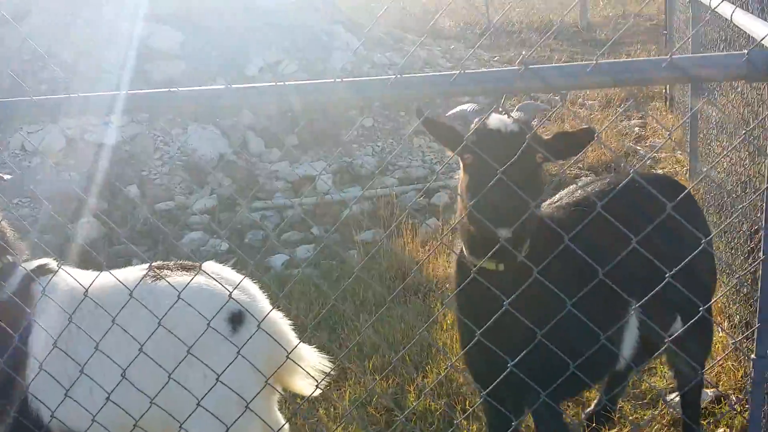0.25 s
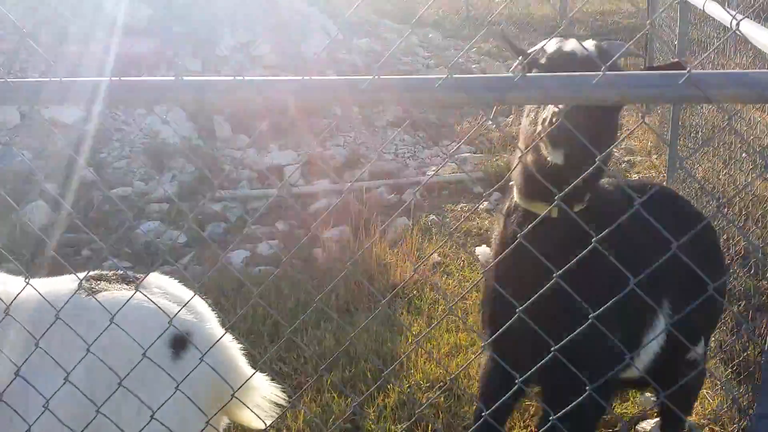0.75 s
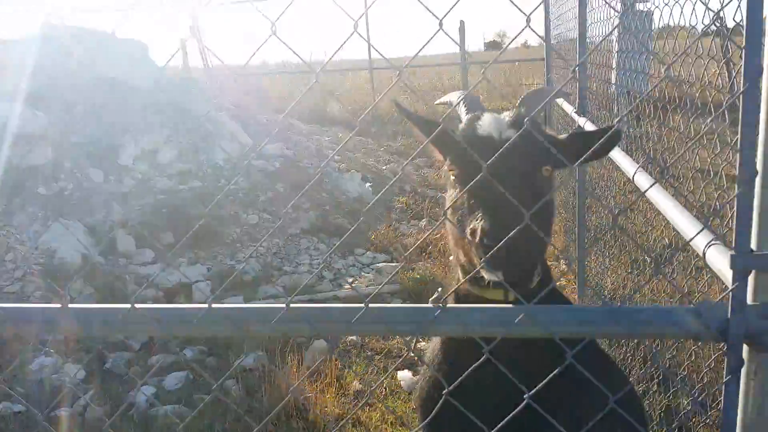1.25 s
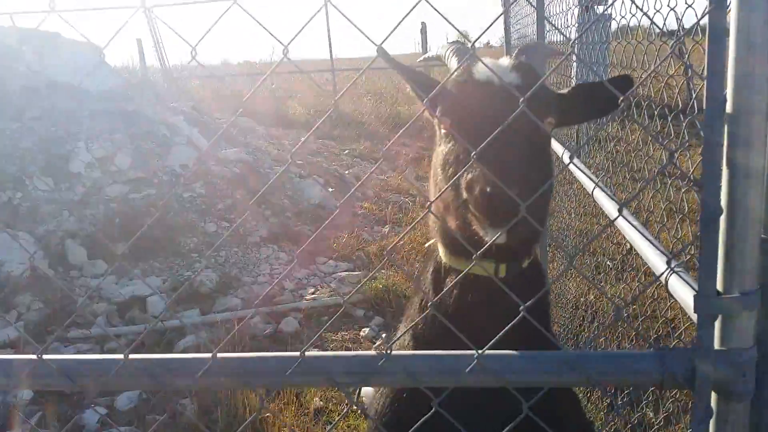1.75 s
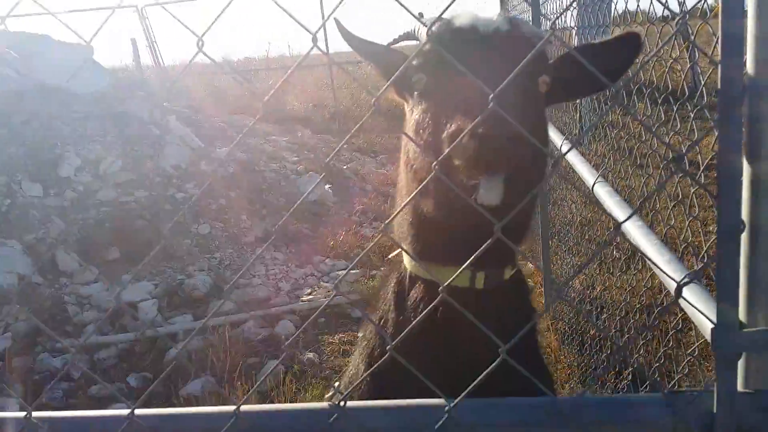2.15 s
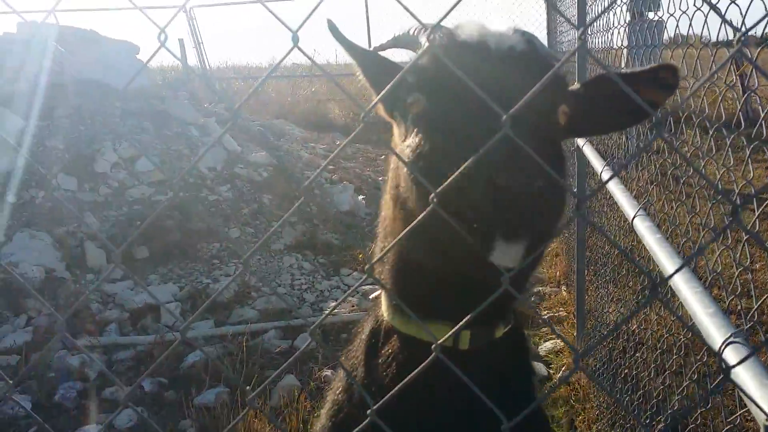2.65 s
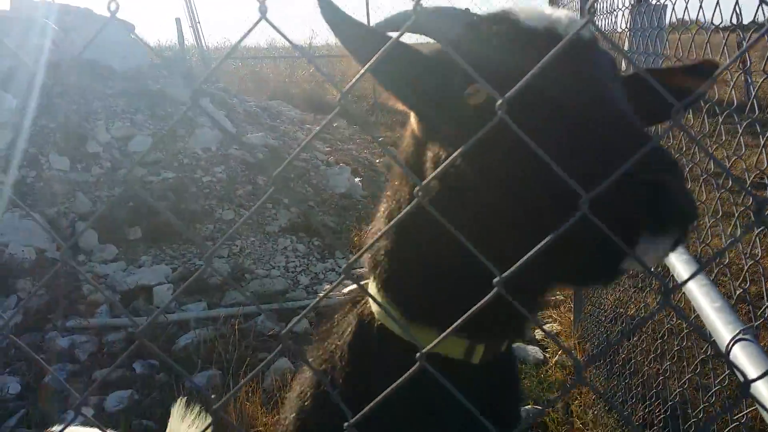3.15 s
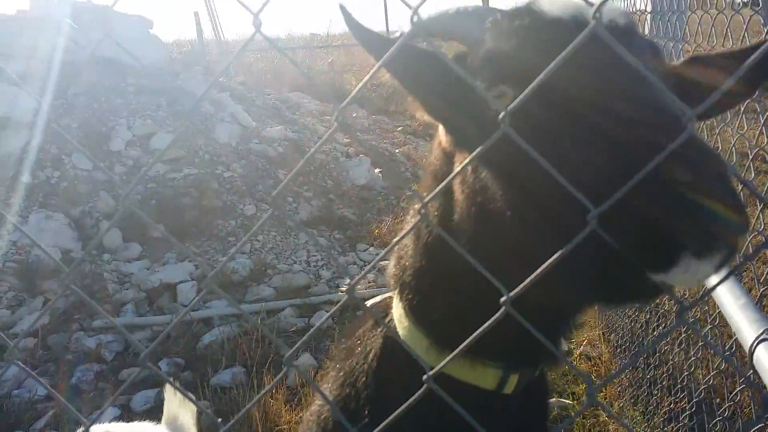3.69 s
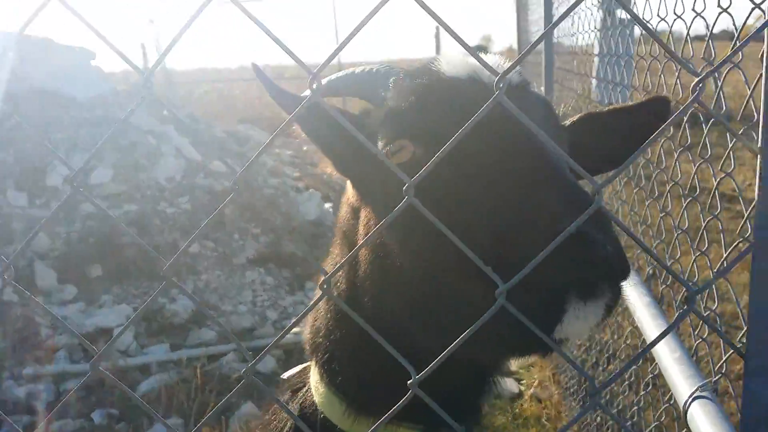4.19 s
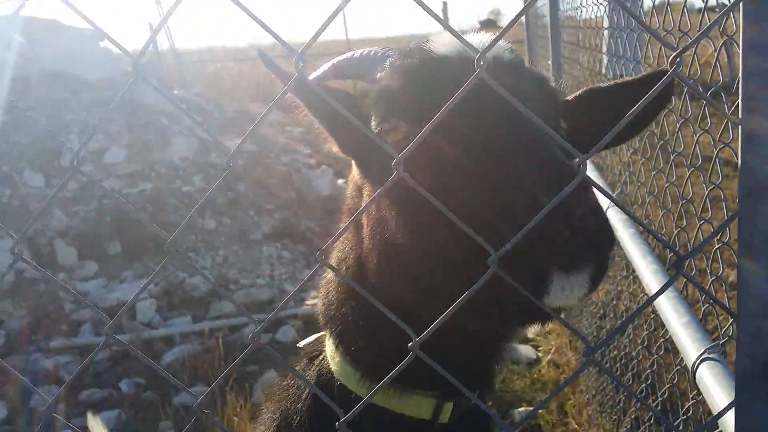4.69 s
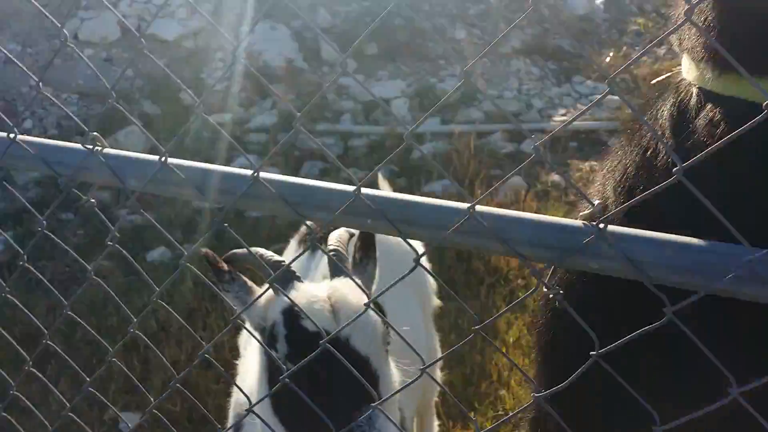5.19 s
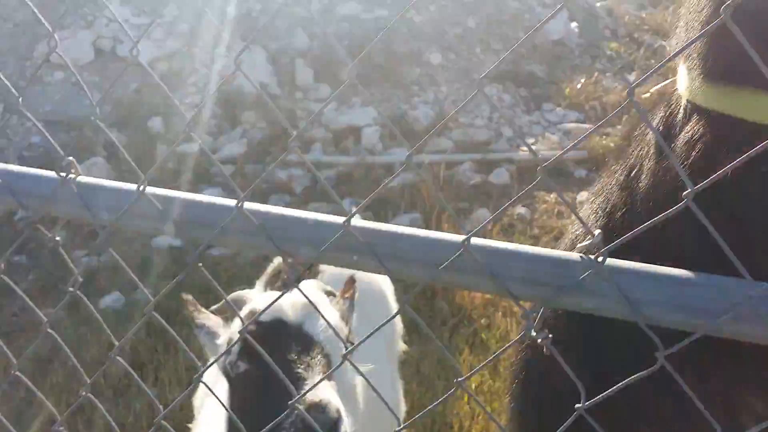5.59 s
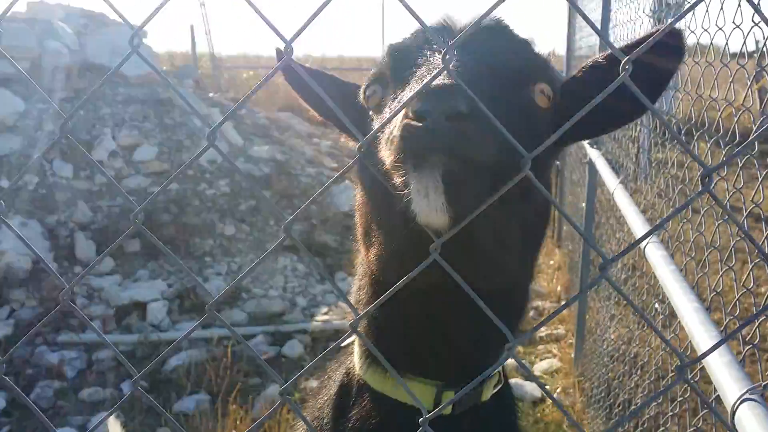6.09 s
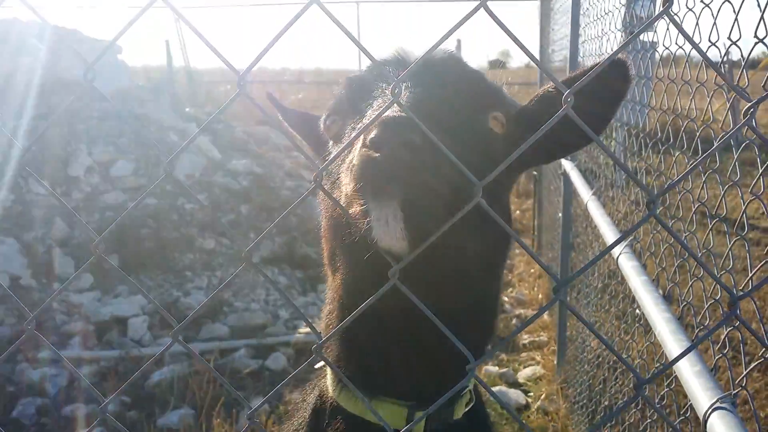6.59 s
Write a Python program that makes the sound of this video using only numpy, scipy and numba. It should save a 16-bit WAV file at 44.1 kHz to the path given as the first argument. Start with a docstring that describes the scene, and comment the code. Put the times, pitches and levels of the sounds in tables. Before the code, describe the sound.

Outdoors, a low raspy goat bleat, a burst of clinking fence wire, then more bleats in a quick run, with small squeaks.

```python
"""An open field, beside a chain-link fence: small goats grunt short hoarse bleats close to a hand-held phone.
Each bleat is a source-filter voice: uneven glottal pulses and breath ring the resonances of the tract.
One goat leans on the fence, whose damped modes rattle and tick and whose stick-slip squeaks.
Behind lie noise bands for far traffic and bass wind, a rustle, a falling bird whistle and a far hum.
The right microphone port is half covered, so the field reaches it late and dull."""
import sys
import numpy as np
from scipy import signal
from scipy.fft import rfft, irfft
from scipy.io import wavfile
from scipy.ndimage import uniform_filter1d
from numba import njit

SR = 44100
rng = np.random.default_rng(int(sys.argv[2]) if len(sys.argv) > 2 else 0)


def pcm_store(signal):
    """Save signal as 16-bit PCM."""
    levels = np.round(np.clip(np.atleast_2d(signal), -1, 1) * 32767)
    wavfile.write(sys.argv[1], SR, levels.astype(np.int16).T)


N = 301644
TIME = np.arange(N) / SR

# Levels hold ahead of the port gains; a width is that of one filter pass.
# Wind and traffic: (time [s], wind level [dB], drone level [dB])
AIR = [(0.0, -54.5, -58.5), (0.6, -54, -53), (0.95, -55, -55.5), (1.6, -49.5, -55.5), (1.75, -57, -57.5),
       (2.28, -49, -53.5), (2.63, -61, -60.5), (2.97, -52, -59.5), (3.2, -54, -46.5), (3.49, -52.5, -52),
       (3.87, -63, -55), (4.42, -54.5, -59.5), (4.99, -54.5, -48), (5.12, -41, -54), (5.31, -49.5, -49),
       (5.9, -54, -55), (6.67, -57, -57.5), (6.84, -58, -54)]
# Relative spectrum of the traffic: (frequency [Hz], density [dB per Hz])
DRONE_SPECTRUM = [(71, -31), (120, -0.5), (307, -4), (361, -10), (482, -3.5), (731, 0), (1280, -20),
                  (1400, -42), (2410, -30.5), (6740, -32), (9000, -38.5), (11700, -67), (19800, -120)]
# Gusts thump the phone: (time [s], blow [dB], frequency [Hz])
BUMPS = [(2.889, -52, 83.4), (2.945, -32, 80.6), (5.123, -27, 104)]
# Gliding bird whistle: (time [s], frequency [Hz], level [dB])
BIRD = [(.465, 9490, -64.5), (.49, 8600, -74), (.52, 7900, -68), (.55, 7320, -77)]
# A goat further off hums: (time [s], pitch [Hz], level [dB])
FAR_HUM = [(4.44, 283.7, -72), (4.5, 287.8, -60), (4.606, 287.4, -59.5), (4.733, 305.7, -57),
           (4.893, 302, -59), (4.93, 321, -56)]
# Microphone hiss re HISS_DB: (frequency [Hz], level [dB])
HISS_SPECTRUM = [(40, 10), (3000, 0), (7000, -6.5), (11000, -2.5), (15000, 0.5)]

# Wire knocks wire: (time [s], strength [dB], treble [dB re strength])
KNOCKS = [(0.597, -45.5, -6), (0.616, -38.5, -11), (0.642, -36.5, -11), (0.666, -42.5, -6),
          (0.696, -46, -11), (0.73, -56, -16), (0.7806, -64, 9), (0.8228, -47, -1.5), (0.9047, -53.5, -9),
          (0.9977, -49.5, -7.5), (1.0775, -58, -21), (1.0933, -32.5, -11), (1.141, -27, -12.5),
          (1.162, -30.5, -8), (1.1795, -24, -8), (1.195, -28.5, -29), (1.225, -26.5, -22),
          (1.27, -28.5, -15), (1.3155, -29.5, -6.5), (1.353, -28.5, -5.5), (1.367, -50, -20),
          (1.397, -27, -20), (1.414, -33, -22), (1.431, -23.5, -18), (1.445, -44, -16), (1.454, -26, -27),
          (1.49, -32, -8), (1.545, -33.5, -10), (1.584, -44, -4), (1.635, -43.5, -19), (1.684, -46, -11),
          (1.6937, -45.5, -12), (1.744, -49, -7), (1.8053, -59.5, 1.5), (1.929, -47, -6)]
# Wire modes: (frequency [Hz], level [dB], decay time to -60 dB [s])
WIRE_MODES = [(2740, -4, .05), (2850, -1, .11), (2960, 0, .12), (3080, -3, .09), (3200, -3, .05),
              (3810, -9, .04), (4590, -7, .04), (5510, -7, .04), (6300, -7, .04), (6600, -4, .04),
              (6980, -6, .04), (7260, -8, .04), (7750, -2, .075), (8210, -2, .05), (9200, -10, .03),
              (12300, -14, .03), (14800, -11, .03)]
# Rumble of the posts: (time [s], level [dB])
RUMBLE = [(.56, -69), (.61, -54), (.85, -50.5), (.98, -81), (1.02, -61.5), (1.22, -47.5), (1.32, -58.5),
          (1.5, -53), (1.63, -53), (1.69, -65), (1.72, -51.5), (1.76, -50.5), (1.78, -64), (1.84, -64),
          (1.86, -50.5), (1.89, -59), (2.06, -64.5)]
# Dry single ticks: (time [s], blow [dB], frequency [Hz])
TICKS = [(0.7793, -27.5, 6800), (0.8036, -40, 6400), (4.277, -39.5, 6530)]
# Wire slips on a post: (time [s], length [s], slip rate at start, middle, end [Hz], level [dB],
# ring [Hz], ring width [Hz], peak of the ground tone [dB re level])
SQUEAKS = [(1.598, 0.048, 1020, 970, 1160, -58, 1490, 1200, 6),
           (1.728, 0.059, 800, 850, 900, -58, 1680, 600, -13),
           (1.838, 0.068, 800, 840, 850, -57, 1690, 600, -16),
           (2.391, 0.074, 615, 610, 840, -53, 1250, 597, -4),
           (2.685, 0.04, 490, 700, 420, -66, 1290, 1510, -5),
           (3.916, 0.041, 610, 585, 580, -55, 1290, 2040, -2),
           (4.103, 0.041, 1150, 1150, 900, -79, 2100, 1200, 9),
           (4.136, 0.043, 903, 800, 640, -71, 1600, 900, -8),
           (4.312, 0.028, 620, 640, 430, -63, 1400, 900, -8),
           (4.332, 0.046, 1140, 1300, 1260, -64, 2500, 700, 7.5),
           (5.291, 0.049, 360, 372, 368, -36, 4760, 2800, 0.5),
           (5.395, 0.055, 371, 391, 372, -34, 4110, 1910, -8.5),
           (5.496, 0.013, 387, 380, 360, -49, 4500, 5000, -22),
           (6.667, 0.048, 622, 570, 580, -59.5, 2430, 3000, 10)]
# One value a squeak: (timing jitter [cycles])
SLIP_UNEVEN = [.03, .012, .012, .02, .04, .012, .02, .04, .03, .02, .004, .005, .01, .003]
# One value a squeak: (share by which the ring climbs [1])
RING_RISE = [0, 0, 0, 0, 0, 0, 0, 0, 0, 0, 0, .25, 0, 0]

# One curve a bleat: (time [s], pitch [Hz], level [dB])
BLEATS = [
    [(0.197, 122.7, -28), (0.213, 125.2, -39), (0.287, 147.2, -30), (0.325, 161.7, -30),
     (0.339, 162.1, -30), (0.399, 150.2, -30), (0.427, 148, -33), (0.436, 144, -39)],
    [(2.063, 121.6, -34), (2.079, 123.4, -43), (2.129, 139.2, -44), (2.207, 143.1, -38),
     (2.263, 160, -38.5), (2.297, 157.1, -40), (2.321, 157.1, -38), (2.38, 133, -51)],
    [(3.108, 121.4, -28), (3.12, 123.8, -47), (3.15, 138.6, -45.5), (3.208, 143.8, -42),
     (3.232, 144.7, -42.5), (3.342, 149.9, -41.5), (3.402, 143.6, -44.5), (3.45, 140, -76)],
    [(4.656, 147.8, -53), (4.678, 147.5, -50), (4.73, 128, -47), (4.774, 129.1, -46), (4.81, 132.4, -42),
     (4.866, 133.9, -50), (4.88, 134.5, -61)],
    [(4.922, 135, -45), (4.952, 143.5, -41.5), (4.982, 145.9, -38.5), (5.024, 162.6, -33),
     (5.096, 168.3, -35), (5.18, 168.4, -33), (5.232, 154.4, -33.5), (5.25, 149.8, -36.5)],
    [(5.25, 152.5, -33), (5.26, 153.3, -43), (5.302, 153.3, -41), (5.326, 148.2, -41), (5.356, 150.5, -43),
     (5.384, 149.6, -44.5), (5.388, 151.2, -44.5), (5.43, 134.7, -46.5)],
    [(5.498, 131.5, -44), (5.535, 140.7, -38.5), (5.563, 158.8, -31.5), (5.605, 162.9, -31),
     (5.671, 163.6, -30.5), (5.721, 162, -32.5), (5.763, 147.8, -33), (5.79, 144, -51)],
    [(5.877, 139, -48), (5.889, 145.4, -41), (5.909, 149.8, -43), (5.929, 155.6, -39.5),
     (5.973, 156.5, -45.5), (6.013, 150, -43.5), (6.037, 155.5, -43.5), (6.07, 153, -54.5)],
    [(6.716, 137.7, -33), (6.738, 137.2, -43.5), (6.766, 132.2, -40.5), (6.8, 135.7, -41.5),
     (6.822, 144, -34), (6.828, 139, -40), (6.84, 151.5, -33)],
]
# Widest mouth opening, one value a bleat: (time [s])
CRESTS = [.33, 2.28, 3.3, 4.78, 5.13, 5.3, 5.65, 5.93, 6.86]
# Roughness of each bleat, 0 to 1: (start [1], crest [1], release [1])
HOARSENESS = [(.7, .45, .25), (.75, .4, .4), (.6, .1, .2), (.55, .22, .25), (.75, .23, .4), (.4, .35, .4),
              (.6, .08, .35), (.45, .25, .35), (.6, .4, .4)]
# Resonances of each bleat: (throat [Hz], mouth [Hz], palate [Hz], nose [Hz],
# frequency scale of the rasp [1], rasp tilt [dB per octave])
RESONANCES = [(555, 1085, 1360, 1940, 0.995, 1), (620, 1033, 1283, 1700, 1.06, -9.5),
              (604, 1000, 1380, 1430, 0.985, -10), (550, 970, 1250, 1770, 0.977, -16),
              (588, 1040, 1381, 2040, 1.02, -5.5), (710, 962, 1210, 1480, 1.047, -8),
              (657, 1087, 1338, 1930, 1.02, -2), (516, 933, 1190, 1470, 0.964, -1.5),
              (580, 1150, 1350, 1710, 1.046, -4.5)]
# Colour of each bleat: (palate at the crest [dB re mouth], throat, nose, rasp, chest peak [dB re level])
COLOURS = [(-1.5, -23.5, -13.5, -7.5, -12.5), (4, -13, -9, -8.5, -3.5), (-12, -12.5, -12.5, -8.5, -7.5),
           (-7, -8, -13.5, -10, -5), (13.5, -10.5, -10.5, -8.5, -6.5), (-3, -9, -1.5, -0.5, -4.5),
           (16, -9.5, -11.5, -5.5, -10), (-14, -3, -1, -6.5, -4.5), (7.5, -10, -11, -11, -6.5)]
# Upper resonances before scale and tilt: (frequency [Hz], width [Hz], level [dB])
RASP = [(2482, 520, 2), (3360, 545, 7.5), (4540, 770, 6.5), (5420, 680, 6), (6686, 680, 1),
        (8050, 12400, -11), (13900, 13000, -19)]
# Added to the five lowest rasp resonances, one row a bleat: (level [dB], five times)
RASP_LEVELS = [(-0.43, 6.5, 1.5, 3, 2.5), (-1.8, 0.5, 0.5, -7, -2.5), (1.8, 2.5, 2, -2, -2),
               (0, 3, -3, -4, 1), (0, 4, 0, 0, 2.5), (-0.15, 0, -4, -0.5, -8), (0, 0, -1, -3, -0.5),
               (-2, 6, -5, 3, -0.5), (0, 3, 0, -2, -2)]

# The links go on shaking after every knock; slope in dB of shake per dB of knock
JINGLE_DB, JINGLE_T60_S, JINGLE_SLOPE = -24.5, 0.27, 0.8
# Blows softer than SOFT_DB ring the modes below SOFT_HZ relatively more, by SOFT_LIFT dB per dB
SOFT_HZ, SOFT_DB, SOFT_LIFT = 3300, -30, .5
SCRAPE_DB = -57

THROAT_WIDTH_HZ, MOUTH_WIDTH_HZ, PALATE_WIDTH_HZ, NOSE_WIDTH_HZ = 220, 175, 130, 600
FILL_HZ, FILL_WIDTH_HZ, FILL_DB = 1214, 790, -7.5  # broad hoarseness between the resonances
HUM_HZ, HUM_WIDTH_HZ, HUM_DB = 1000, 480, 7.7  # throat of the far goat; dB re its ground tone
ATTACK_S, RELEASE_S, RELEASE_DB = .022, .018, -25
BREATH_T60_S, BREATH_DB = 0.2, -16.5  # breath runs on after the folds stop; dB re the loudest moment
PALATE_LOSS_START_DB, PALATE_LOSS_END_DB = 11, 8
RASP_LOSS_START_DB, RASP_LOSS_END_DB, CHEST_LOSS_START_DB = 2.5, 3.5, 5.5
THROAT_EARLY_DB = 2.5  # the throat is heard more while the mouth is still nearly shut
# Shares by which resonances lie lower at the start or the release
PALATE_DROP_START, PALATE_DROP_END, MOUTH_DROP_END, RASP_DROP_END = .16, .1, 0.065, 0.11
WAVER_DB, RASP_FLICKER_DB = 0.95, 2.5
PUFF_CYCLES = .7  # time constant of each breath puff
SPREAD_T60_S, SCATTER_DB = .014, 3  # the upper resonances answer each pulse over a few ms

PORT_HZ, PORT_WIDTH_HZ, PORT_DB = 6530, 1160, 0.18  # resonance of the open port
COVER_HZ, COVER_DB, COVER_LAG = 185, -3.5, 8  # lag in samples
LEAK_HZ, LEAK_DB = 4670, -25  # sound that creeps round the cover
OPEN_DB = 5  # gain of both ports
HISS_DB, TOP_HZ = -64, 15800


def undb(db):
    """Level to amplitude: twenty decibels are a factor of ten."""
    return 10 ** (np.asarray(db) / 20)


def unit(x):
    """Normalisation to a root-mean-square of one."""
    return x / np.sqrt(np.mean(x ** 2))


@njit
def svf(x, hz, width):
    """State-variable resonance: a band-pass with a moving centre, gain 1 there."""
    y, band_state, low_state = np.empty(len(x)), 0., 0.
    for i in range(len(x)):
        g, k = np.tan(np.pi * hz[i] / SR), width / hz[i]
        v = (band_state + g * (x[i] - low_state)) / (1 + g * (g + k))
        band_state = 2 * v - band_state
        low_state += 2 * g * v
        y[i] = k * v
    return y


def band(x, hz, width):
    """Resonance about a fixed or moving centre, kept inside the audible range."""
    return svf(x + 1e-18, np.clip(hz + np.zeros(len(x)), 20., .45 * SR), 1. * width)


def band2(x, hz, width):
    """Cascaded resonance: two equal passes steepen the skirts."""
    return band(band(x, hz, width), hz, width)


def twice(x, hz, width):
    """Cascaded resonance at unit level."""
    return unit(band2(x, hz, width))


def ring(x, hz, t60):
    """Damped free vibration: one mode decays exponentially, its envelope starting at the blow's size."""
    pole = np.exp(2j * np.pi * hz / SR - np.log(1000) / (t60 * SR))
    return signal.lfilter([1], [1, -pole], x).imag


def walk(rate, size=N):
    """Slow random modulation: levels held 1 / rate s and slewed twice; spread near 1."""
    hold = int(SR / rate)
    levels = np.repeat(rng.standard_normal(size // hold + 1), hold)
    return 1.33 * uniform_filter1d(uniform_filter1d(levels, hold), hold)[:size]


def pulses(hz, jitter, shimmer_db):
    """Quasi-periodic excitation: one pulse a cycle, jittered in time and size; also the phase in cycles."""
    phase = np.cumsum(hz) / SR
    cycle = np.arange(int(phase[-1])) + .5
    chance = rng.standard_normal((len(cycle), 2)).T
    due = np.searchsorted(phase, cycle)
    at = np.interp(cycle + jitter[due] * chance[0], phase, np.arange(len(hz) - 0.)).clip(0, len(hz) - 2)
    size = undb(shimmer_db[due] * chance[1].clip(-2, 1.3))
    out = np.zeros(len(hz))
    # share each pulse between the two nearest samples
    np.add.at(out, at.astype(int), size * (1 - at % 1))
    np.add.at(out, at.astype(int) + 1, size * (at % 1))
    return out, phase


def blows(times, sizes):
    """Impulsive excitation: single-sample blows."""
    out = np.zeros(N)
    np.add.at(out, (np.asarray(times) * SR).astype(int), sizes)
    return out


def taps(table, t60):
    """Impulse response of single modes: damped blows at (time [s], blow [dB], frequency [Hz])."""
    return sum(ring(blows([s], undb(db)), hz, t60) for s, db, hz in table)


def smear(x, t60, db):
    """Diffuse reflection: convolution with a short tail of decaying noise."""
    tail = rng.standard_normal(6000) * undb(-60 * np.arange(6000) / SR / t60)
    return undb(db) * signal.fftconvolve(x, tail / np.sqrt(np.sum(tail ** 2)))[:len(x)]


def spread(x, t60):
    """Scattering: each pulse gains a short tail of echoes whose pattern slowly turns into another."""
    turn = np.linspace(0, 1.5 * np.pi, len(x))
    return x + np.cos(turn) * smear(x, t60, SCATTER_DB) + np.sin(turn) * smear(x, t60, SCATTER_DB)


def whistle(table):
    """Frequency modulation: a near sine follows (time [s], frequency [Hz], level [dB])."""
    s, hz, db = np.transpose(table)
    gain = undb(np.interp(TIME, s, db, -200, -200))
    return np.sqrt(2) * gain * np.sin(2 * np.pi * np.cumsum(np.interp(TIME, s, hz)) / SR)


def traffic():
    """Filtered noise: half-octave bands that swell together and flicker alone make the far drone."""
    s, _, level_db = np.transpose(AIR)
    hz, density_db = np.transpose(DRONE_SPECTRUM)
    drone, swell = 0, walk(0.97)
    for f in 140 * 2 ** np.arange(0, 6.1, .5):
        colour_db = np.interp(np.log(f), np.log(hz), density_db) + 2.07 * swell + 3.4 * walk(8)
        drone = drone + undb(colour_db) * band2(rng.standard_normal(N), f, f / 2)
    return unit(drone) * undb(np.interp(TIME, s, level_db))


def bass_noise():
    """Band-limited turbulence: one independent draw of low-frequency noise."""
    return unit(band(band(rng.standard_normal(N), 78.6, 81), 85.0, 86))


def wind():
    """Partial coherence: the bass noise of the wind is partly shared and partly differs at the two ports."""
    s, level_db, _ = np.transpose(AIR)
    shared, left, right = bass_noise(), bass_noise(), bass_noise()
    stir = undb(1.6 * walk(6.12)) * (0.87 * shared + 0.82 * np.array([left, right]))
    return stir * undb(np.interp(TIME, s, level_db))


def rustle():
    """Gated noise: faint brief treble rustles come and go, perhaps dry grass."""
    gate = np.maximum(walk(45) - 1.1, 0)
    return undb(-69.5) * gate * unit(band(rng.standard_normal(N), 6800, 2700))


def hum():
    """Source and filter: the far goat is a ground tone, and uneven breathy pulses through a broad throat."""
    s, hz, db = np.transpose(FAR_HUM)
    beat, _ = pulses(np.interp(TIME, s, hz), np.full(N, .035), np.full(N, 3.))
    throat = twice(unit(beat) + .6 * rng.standard_normal(N), HUM_HZ, HUM_WIDTH_HZ)
    return whistle(FAR_HUM) + throat * undb(np.interp(TIME, s, db, -200, -200) + HUM_DB + 2 * walk(15))


def squeaks():
    """Stick-slip friction: regular pulses through a broad ring, swelling and fading."""
    out = np.zeros(N)
    for row, uneven, rise in zip(SQUEAKS, SLIP_UNEVEN, RING_RISE):
        s, length, *rates_hz, db, ring_hz, width, tone_db = row
        start, size = int(s * SR), int(length * SR)
        glide_hz = np.polyval(np.polyfit(range(3), rates_hz, 2), np.linspace(0, 2, size))
        slips, phase = pulses(glide_hz, np.full(size, uneven), np.full(size, 100 * uneven))
        ring_hz = ring_hz * (1 + rise * np.linspace(0, 1, size) ** 2)
        sound = band(band(slips, ring_hz, width), ring_hz, 1.5 * width) + 0.071 * slips
        sound = unit(sound + smear(sound, .005, -5))
        sound += undb(tone_db) * np.sin(2 * np.pi * phase)
        scrape = twice(rng.standard_normal(size), 920, 610) * np.hanning(size)
        out[start:start + size] += undb(SCRAPE_DB) * scrape
        out[start:start + size] += undb(db) * sound * signal.windows.tukey(size, .85)
    return out


def jingle_level():
    """Energy addition: each knock sets the links shaking, and the decaying energies sum."""
    s, db, _ = np.transpose(KNOCKS)
    energy = blows(s, undb(2 * (JINGLE_SLOPE * db + JINGLE_DB)))
    shaking = signal.lfilter([1], [1, -undb(-120 / JINGLE_T60_S / SR)], energy)
    return np.sqrt(np.abs(uniform_filter1d(shaking, size=900, origin=449)))


def wire_modes():
    """Modal superposition: each knock rings the wire modes in its own mix; random link blows make chatter."""
    s, db, _ = np.transpose(KNOCKS)
    links = (rng.random(N) < 900 / SR) * undb(2.5 * rng.exponential(size=N))  # about 900 a second
    mix = rng.standard_normal((len(s), len(WIRE_MODES)))
    knocks, chatter = 0, 0
    for k, (hz, mode_db, t60) in enumerate(WIRE_MODES):
        soft_db = (hz < SOFT_HZ) * SOFT_LIFT * np.maximum(SOFT_DB - db, 0)
        sizes = undb(db + mode_db - 22.0 + soft_db) * (1 + 1.38 * mix[:, k])
        knocks = knocks + ring(blows(s, sizes), hz, t60)
        chatter = chatter + undb(mode_db) * ring(links * rng.standard_normal(N), hz, t60)
    return knocks, unit(chatter)


def fence():
    """Modal density: distinct wire modes ring over noise for the unresolved ones; the posts rumble."""
    s, db, treble_db = np.transpose(KNOCKS)
    jingle = jingle_level()
    knocks, chatter = wire_modes()
    # the many unresolved modes die as a burst of noise
    n = np.arange(3000)
    fade = undb(-60 * n / SR / 0.06) * np.minimum(n / 110, 1)
    burst = signal.fftconvolve(blows(s, undb(db - 11)), fade)[:N] + undb(1) * jingle
    sizzle = signal.fftconvolve(blows(s, undb(db + treble_db + 3.5)), fade)[:N] + undb(-36) * jingle
    noise = burst * unit(band(rng.standard_normal(N), 4060, 7200))
    noise += sizzle * unit(band(rng.standard_normal(N), 8300, 4000))
    rumble = undb(np.interp(TIME, *np.transpose(RUMBLE), -200, -200))
    posts = undb(3 * walk(25)) * unit(band(rng.standard_normal(N), 480, 630))
    return knocks + undb(4.5) * jingle * chatter + noise + rumble * posts


def upper_rasp(airy, scale, tilt_db, levels_db, after):
    """Higher formants: parallel upper resonances flicker singly in level and wander together in frequency."""
    wander = scale + .012 * walk(9, size=len(airy))  # slight and random
    sag = RASP_DROP_END * after ** 2
    rasp = 0
    for k, (hz, width, level_db) in enumerate(RASP):
        extra_db = levels_db[k] if k < len(levels_db) else 0
        slope_db = tilt_db * np.log2(hz / RASP[1][0])
        flicker_db = RASP_FLICKER_DB * walk(34.6, size=len(airy))
        centre_hz = hz * (wander - sag * (k < 2))  # only the two lowest sag
        rasp = rasp + undb(level_db + extra_db + slope_db + flicker_db) * band2(airy, centre_hz, width)
    return unit(rasp)


def bleat(curve, crest, hoarse, resonances, colour, levels_db):
    """Source and filter: uneven glottal pulses and breath puffs ring the tract; the chest hums the pitch."""
    s, curve_hz, curve_db = np.transpose(curve)
    start, release = s[0], max(s[-1], crest + .01)
    throat_hz, mouth_hz, palate_hz, nose_hz, scale, tilt_db = resonances
    palate_db, throat_db, nose_db, rasp_db, chest_db = colour
    t = np.arange(start, release + BREATH_T60_S / 2, 1 / SR)
    # distance from the crest: 1 at the start, 1 from the release on
    before = np.clip((crest - t) / (crest - start), 0, 1)
    after = np.clip((t - crest) / (release - crest), 0, 1)
    early, ending = before ** 2, after ** 2
    late = np.maximum(t - release, 0)

    hz = uniform_filter1d(np.interp(t, s, curve_hz), size=900, mode="nearest")
    db = np.interp(t, s, curve_db) + WAVER_DB * walk(34.1, size=len(t))
    db += RELEASE_DB * late / RELEASE_S
    breath_db = max(curve_db) + BREATH_DB - 60 * late / BREATH_T60_S
    breath_db = breath_db - 60 * before + 20 * np.log10(ending + 1e-6)
    rough = hoarse[1] + (hoarse[0] - hoarse[1]) * early + (hoarse[2] - hoarse[1]) * ending

    beat, phase = pulses(hz, .06 * rough, 5.5 * rough)
    puff = unit(np.exp(-(phase % 1) / PUFF_CYCLES) * rng.standard_normal(len(t)))
    source = unit(beat) + .4 * rough * puff
    # the upper resonances hear more breath
    airy = unit(spread(source, SPREAD_T60_S)) + (.4 + 1.5 * rough) * puff

    mouth = twice(source, mouth_hz * (1 - MOUTH_DROP_END * ending), MOUTH_WIDTH_HZ)
    moved_hz = palate_hz * (1 - PALATE_DROP_START * early - PALATE_DROP_END * ending)
    palate = twice(source, moved_hz, PALATE_WIDTH_HZ)
    palate_gain = undb(palate_db - PALATE_LOSS_START_DB * early - PALATE_LOSS_END_DB * ending)
    # palate and throat enter with reversed sign
    voice = (mouth - palate_gain * palate) / np.sqrt(1 + palate_gain ** 2)
    voice += undb(nose_db) * twice(airy, nose_hz, NOSE_WIDTH_HZ)
    voice -= undb(throat_db + THROAT_EARLY_DB * early) * twice(source, throat_hz, THROAT_WIDTH_HZ)
    voice += undb(FILL_DB) * twice(airy, FILL_HZ, FILL_WIDTH_HZ)
    rasp_db = rasp_db - RASP_LOSS_START_DB * early - RASP_LOSS_END_DB * ending
    voice += undb(rasp_db) * upper_rasp(airy, scale, tilt_db, levels_db, after)
    chest_db = chest_db - CHEST_LOSS_START_DB * early + 2 * walk(37.0, size=len(t))
    voice += undb(chest_db) * np.sin(2 * np.pi * phase)

    breath = twice(rng.standard_normal(len(t)), mouth_hz, 480)
    breath += undb(-13.5) * twice(rng.standard_normal(len(t)), RASP[1][0], 1500)
    attack = np.minimum((t - start) / ATTACK_S, 1)
    return voice * undb(db) * attack + undb(breath_db) * breath


def goats():
    """Superposition: every near bleat at its moment, with a short diffuse reflection off ground and fence."""
    out = np.zeros(N)
    for curve, *rest in zip(BLEATS, CRESTS, HOARSENESS, RESONANCES, COLOURS, RASP_LEVELS):
        voice, start = bleat(curve, *rest), int(curve[0][0] * SR)
        out[start:start + len(voice)] += voice[:N - start]
    return out + smear(out, .07, -13)


def ports(x, elsewhere):
    """Low-pass obstruction: left is open and rings in the treble; the covered right hears late and dull."""
    late = np.concatenate([np.zeros(COVER_LAG), x])[:N] + smear(x, .05, -8) + elsewhere
    pole = np.exp(-2 * np.pi * COVER_HZ / SR)
    dull = signal.lfilter([1 - pole], [1, -pole], late)
    creeping = late + walk(25) * smear(x, 0.092, 6.5)  # the diffuse part wavers at random
    leak = signal.sosfilt(signal.butter(2, LEAK_HZ, fs=SR, output="sos"), creeping)
    right = undb(COVER_DB) * dull + undb(LEAK_DB) * leak
    left = x + undb(PORT_DB) * band(x, PORT_HZ, PORT_WIDTH_HZ)
    return np.array([left, right]) * undb(OPEN_DB)


def scene():
    """Superposition: the field passes the ports, while wind and gusts act on the phone directly."""
    drone = traffic()
    field = drone + rustle() + whistle(BIRD) + hum()
    field = field + taps(TICKS, 0.0012) + squeaks() + fence() + goats()
    # the drone arrives from all round, so part of it differs at the right port
    return ports(field, 0.53 * np.roll(drone, 3000)) + wind() + taps(BUMPS, 0.091)


def record(dry):
    """Band limitation: each microphone adds its own hiss; bass and top are cut."""
    hz, db = np.transpose(HISS_SPECTRUM)
    colour = undb(np.interp(np.log(np.fft.rfftfreq(N, 1 / SR) + 1), np.log(hz), db))
    hiss = irfft(rfft(rng.standard_normal(dry.shape)) * colour, N)
    wet = dry + undb(HISS_DB) * hiss
    wet = signal.sosfilt(signal.butter(3, 48, "high", fs=SR, output="sos"), wet)
    return signal.sosfilt(signal.ellip(8, .2, 70, TOP_HZ, fs=SR, output="sos"), wet)


dry = scene()
out = record(dry)
pcm_store(out)
```